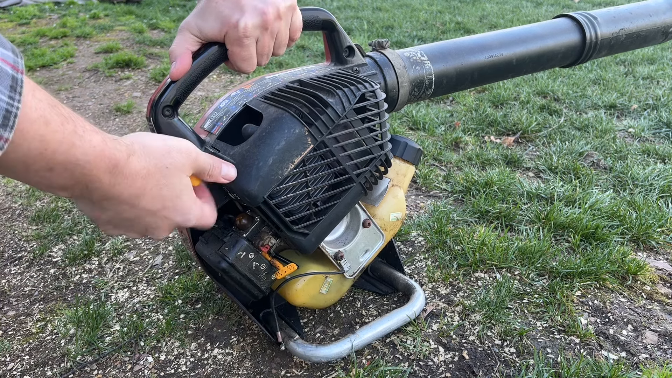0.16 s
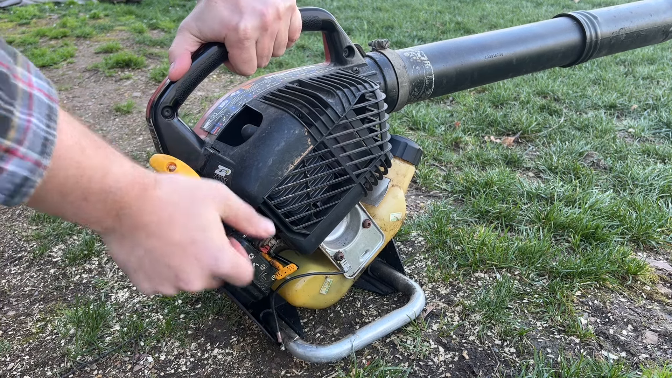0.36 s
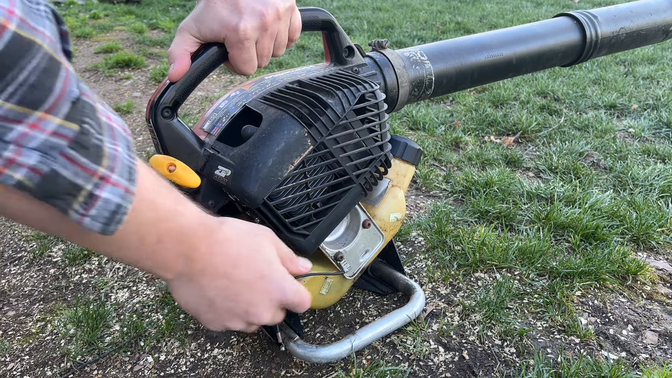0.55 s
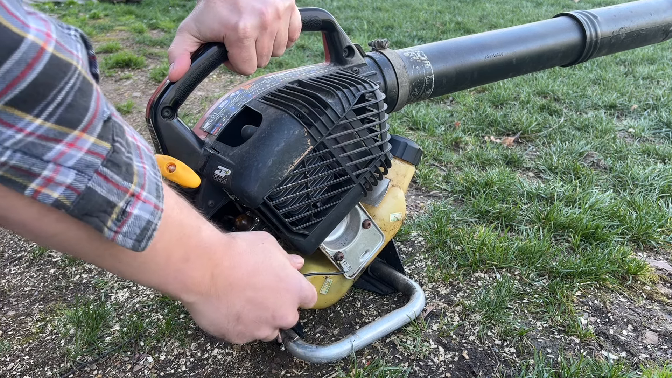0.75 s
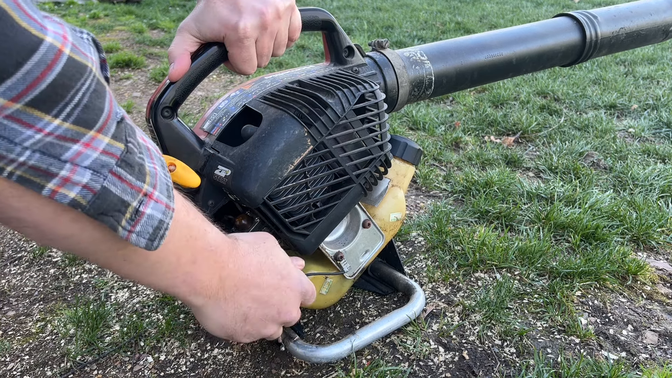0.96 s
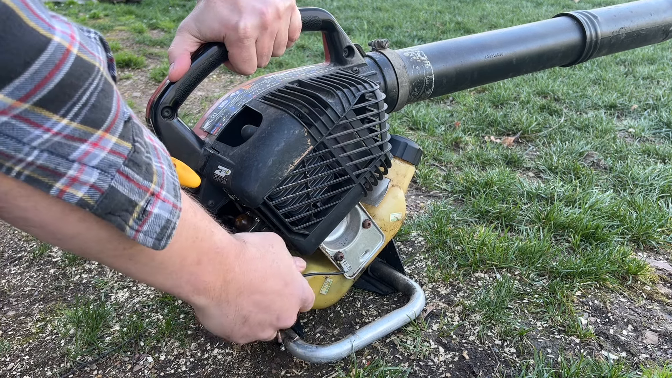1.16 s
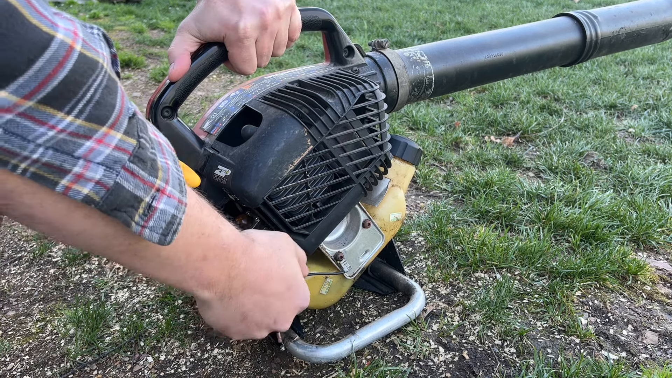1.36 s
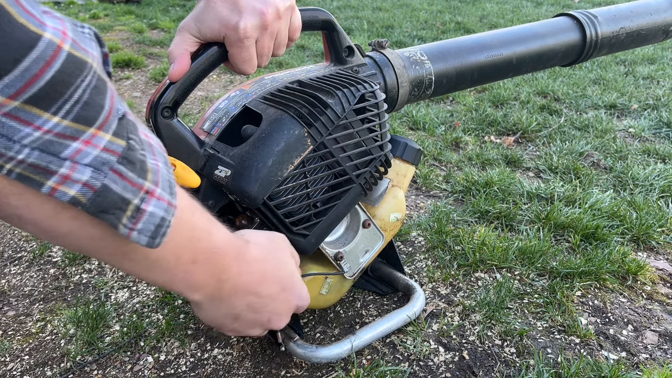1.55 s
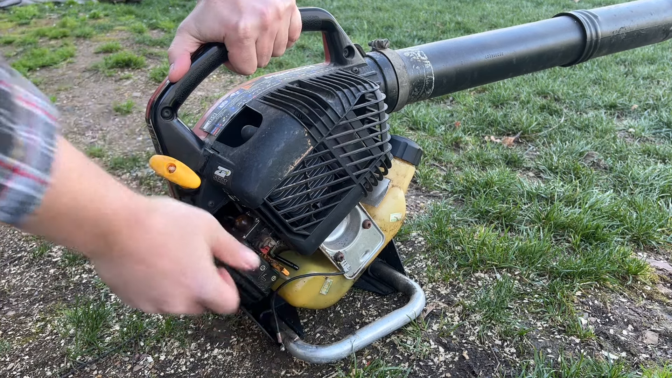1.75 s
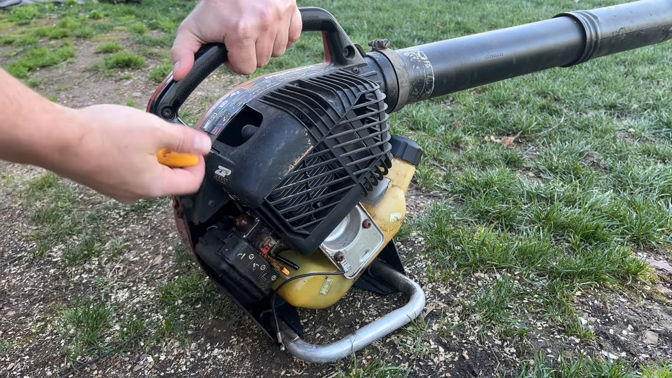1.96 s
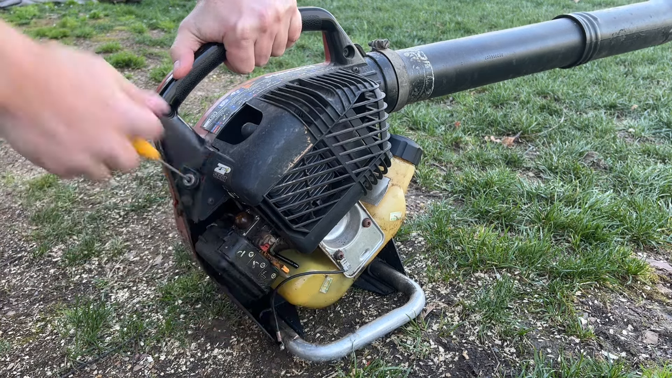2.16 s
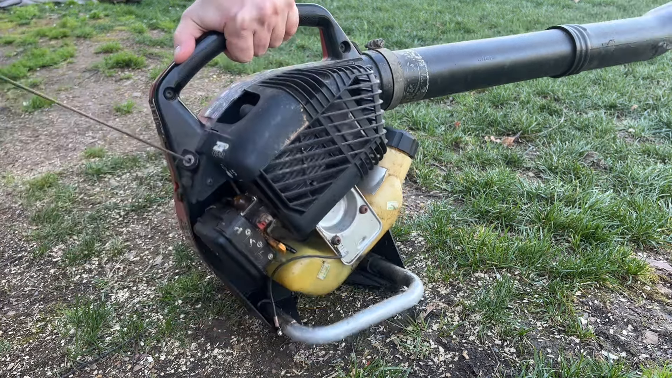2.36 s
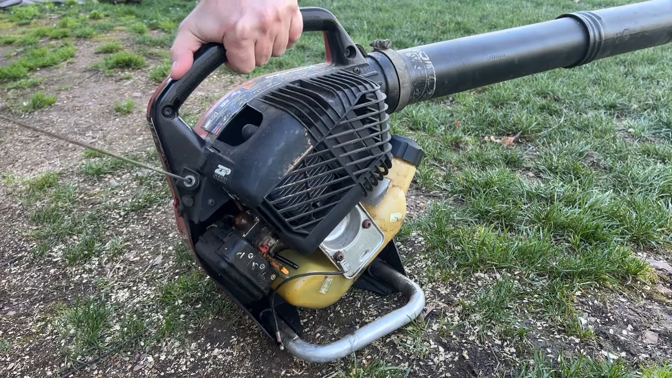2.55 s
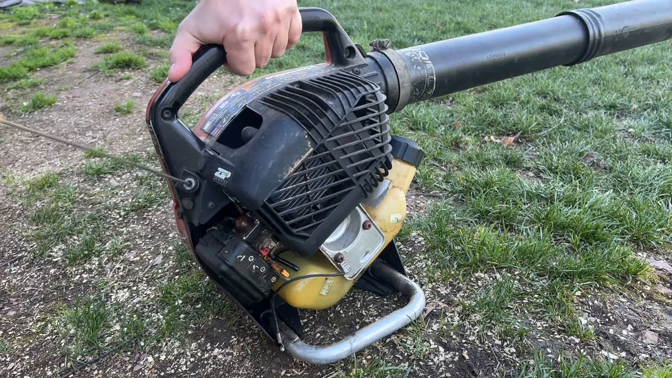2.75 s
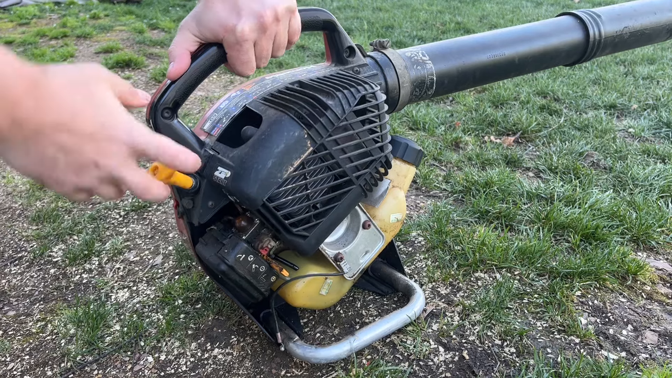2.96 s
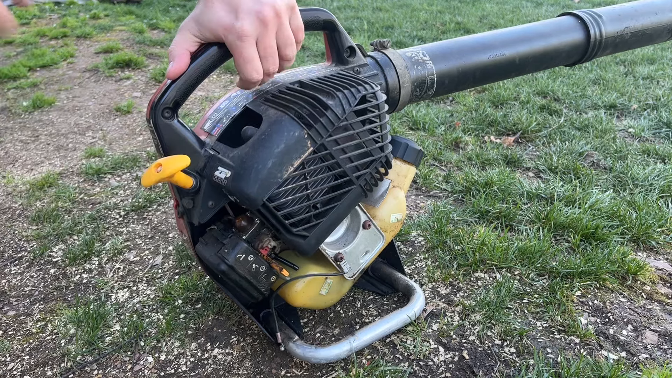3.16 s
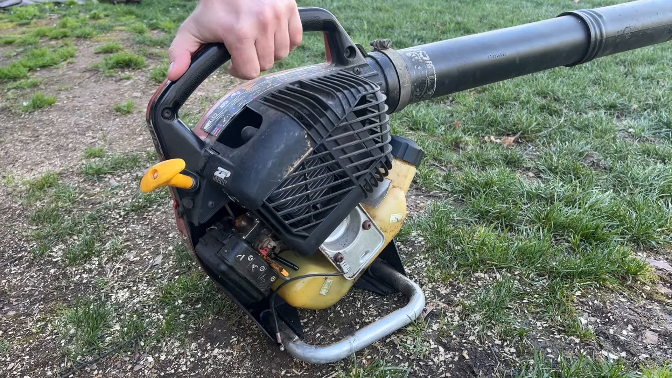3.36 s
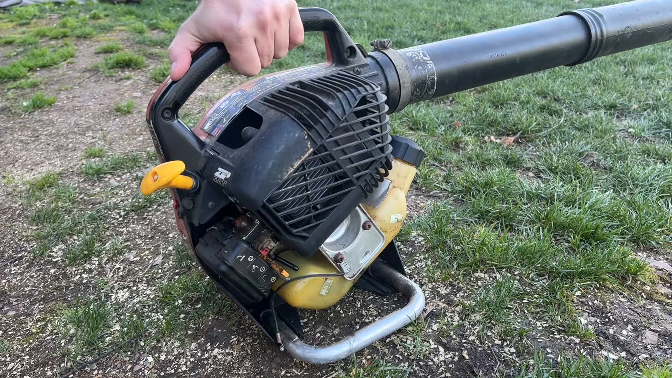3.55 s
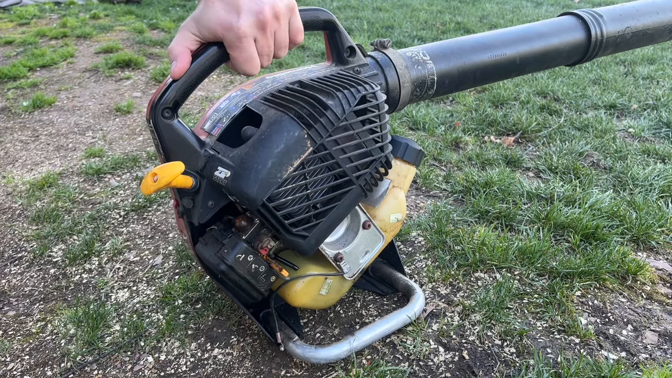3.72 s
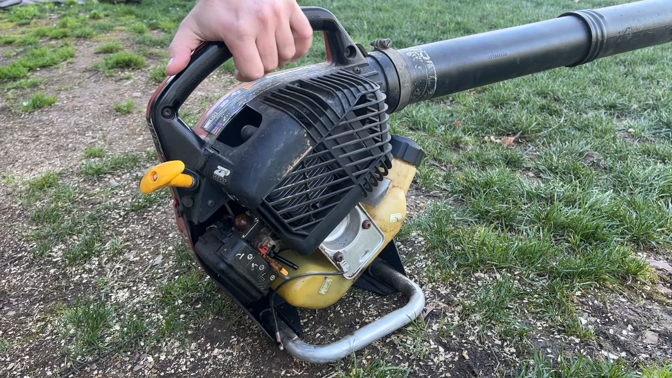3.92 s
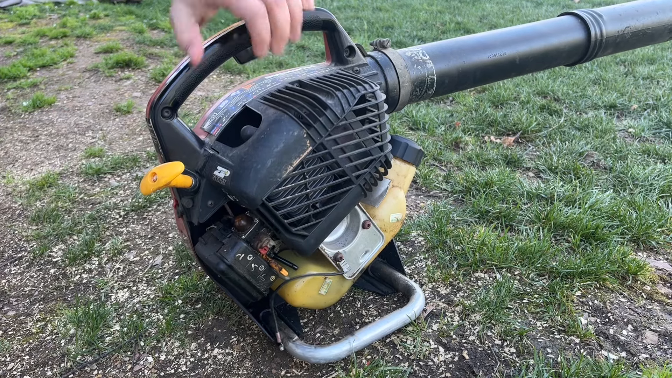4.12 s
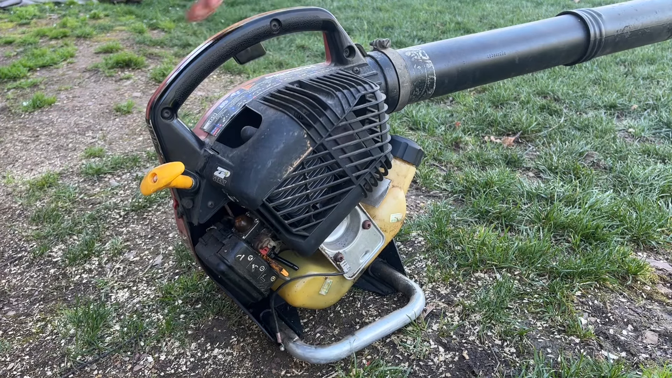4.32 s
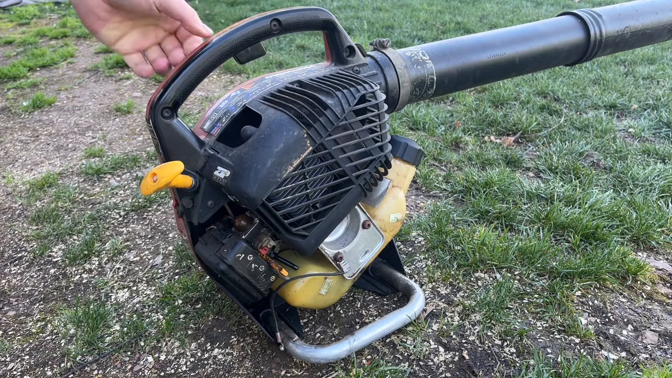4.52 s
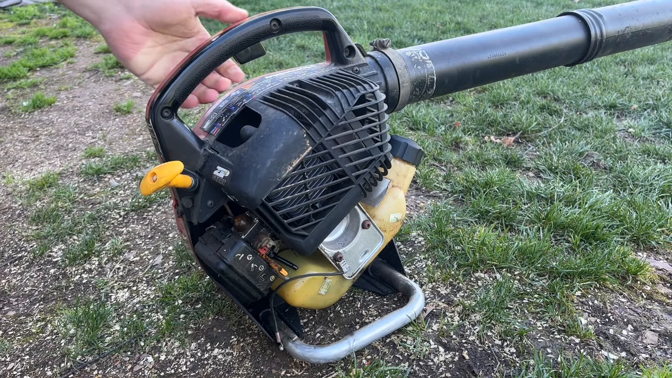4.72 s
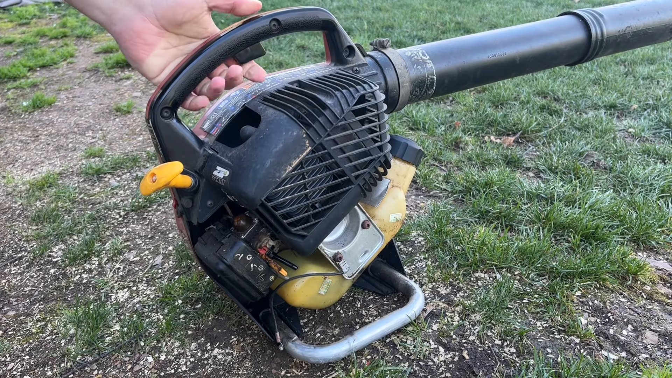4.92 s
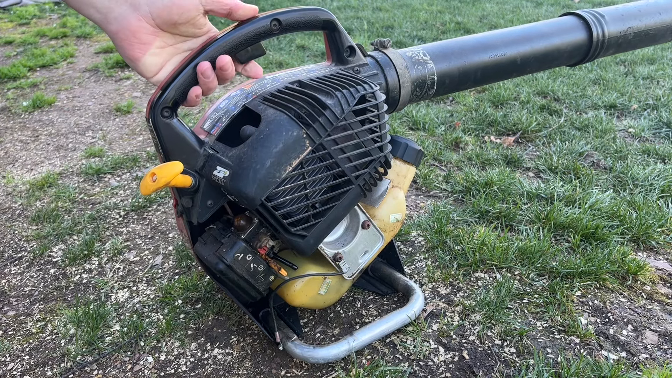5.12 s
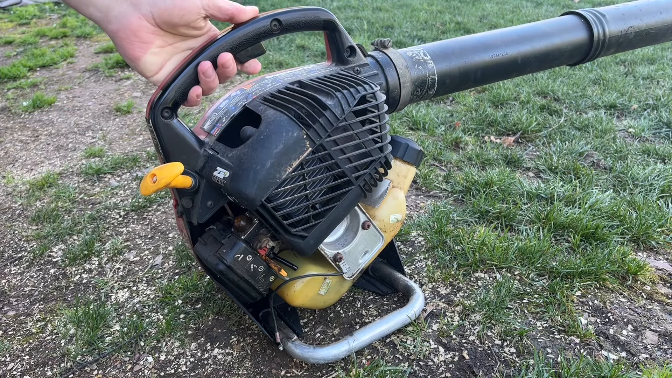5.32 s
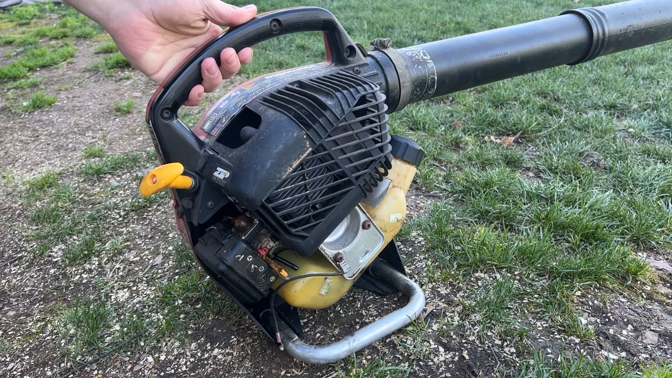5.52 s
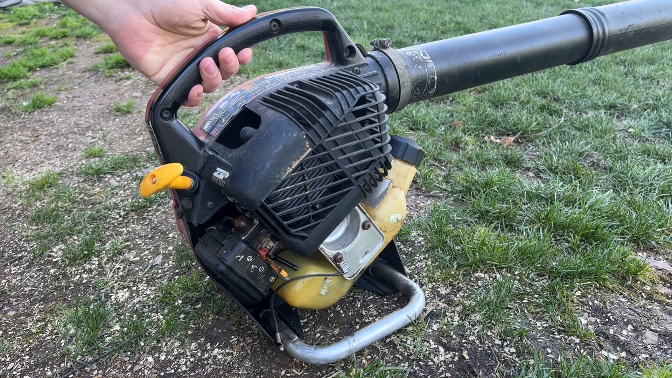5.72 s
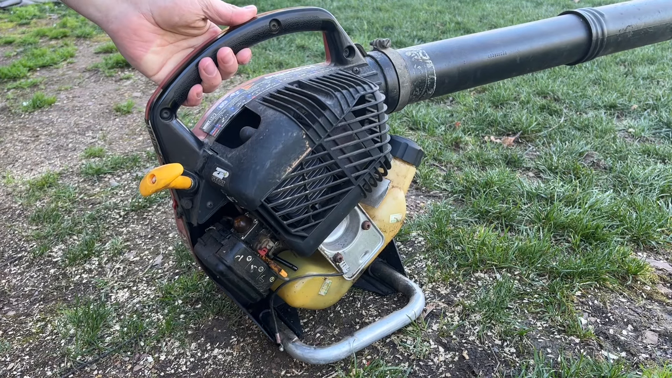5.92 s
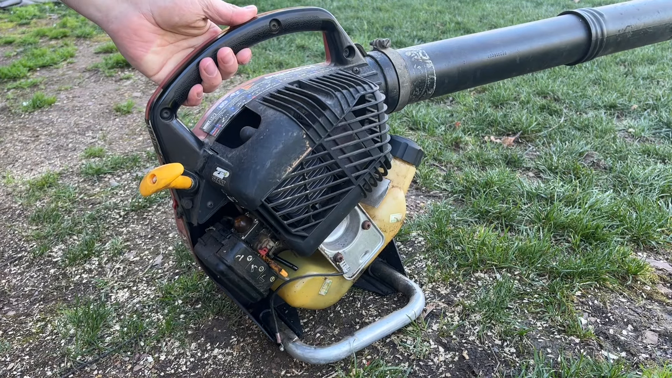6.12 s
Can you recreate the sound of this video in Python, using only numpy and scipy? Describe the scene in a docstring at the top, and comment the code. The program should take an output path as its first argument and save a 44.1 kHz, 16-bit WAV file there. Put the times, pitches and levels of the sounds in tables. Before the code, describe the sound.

Close outdoors, over faint far traffic, a hand brushes and taps plastic parts for two seconds. A quick cord whirr, and a small two-stroke engine bursts to life, rattling as it climbs. It dips, revs higher, coasts down to a slow, lumpy putter, then roars up again and is still held at the end. Close phone microphone with slight stereo width.

```python
"""On a lawn, close to a phone with two microphone ports; far traffic rumbles throughout as shaped noise.
First a hand fumbles at starter and primer: cloth rustles as noise, plastic taps ring as decaying tones.
The cord whirrs, a small two-stroke leaf blower catches, and a second pulse train rattles in the housing.
Three revs follow: shaft orders, intake barks and exhaust puffs once a turn, with casing rattle and fan hiss.
Between revs it coasts with lone firings; the sound ends with the third throttle opening still held."""
import sys
import numpy as np
from scipy import signal
from scipy.fft import rfft, irfft, next_fast_len
from scipy.io import wavfile
from scipy.ndimage import uniform_filter1d, map_coordinates

SR = 44100
rng = np.random.default_rng(int(sys.argv[2]) if len(sys.argv) > 2 else 0)


def materialize(psi):
    """Save the field psi as 16-bit PCM at rate SR to the path in sys.argv[1].

    A 1-D psi becomes a single channel; in a 2-D psi each row is a channel.
    """
    bounded = np.clip(np.atleast_2d(psi).T, -1, 1)
    quanta = np.round(bounded * 32767).astype(np.int16)
    wavfile.write(sys.argv[1], SR, quanta)


N = 272538


def amp(db):
    """Amplitude factor of a level in dB."""
    return 10 ** (np.asarray(db) / 20)


def unit(x):
    """x scaled to rms 1."""
    return x / np.sqrt(np.mean(x ** 2) + 1e-20)


def clock():
    """Time of every sample in seconds."""
    return np.arange(N) / SR


def along(points, hz):
    """Values of (f/Hz, value) points, joined on a log frequency axis."""
    f, v = np.transpose(points)
    return np.interp(np.log(hz + 1), np.log(f + 1), v)


def curves(rows):
    """One value per sample for each column after the time."""
    s, *cols = np.transpose(rows)
    return [np.interp(clock(), s, c) for c in cols]


def running(rows):
    """0 before the first row's time, then a quick rise to 1."""
    return np.clip((clock() - rows[0][0]) / 0.013, 0, 1)


def wobble(rate):
    """A smooth random curve with rate knots a second."""
    coarse = np.arange(0, N + 32, 32)
    knots = rng.standard_normal(int(N * rate / SR) + 4)
    return np.interp(np.arange(N), coarse, map_coordinates(knots, [coarse * rate / SR]))


def filtered(x, response):
    """x passed through a complex response of frequency."""
    m = next_fast_len(N + SR // 2)
    return irfft(rfft(x, m) * response(np.fft.rfftfreq(m, 1 / SR)), m)[..., :N]


def modes(table):
    """Causal response of (f/Hz, width/Hz, level/dB) resonances, added with alternating sign."""
    def response(f):
        return sum((-1) ** k * amp(db) * 1j * f * width / (c * c - f * f + 1j * f * width)
                   for k, (c, width, db) in enumerate(table))
    return response


def steady(x, seconds):
    """x with its slow level evened out to rms 1."""
    return x / np.sqrt(np.abs(uniform_filter1d(x ** 2, round(seconds * SR))) + 1e-12)


# far traffic: t/s, level/dB
TRAFFIC_LEVEL = [(0, -46), (.6, -45), (1.3, -47), (1.65, -43), (2.1, -45)]
# its spectrum: f/Hz, relative level/dB per Hz
TRAFFIC_SPECTRUM = [(25, -28), (75, 1.5), (131, -8.5), (191, -12.5), (330, -23.5), (600, -34.5),
                    (1200, -38), (1800, -45.5), (2200, -56), (4000, -53), (8000, -64), (12000, -58),
                    (15500, -70)]


def traffic():
    """Far road rumble with a thin hiss above it, from spectrally shaped noise."""
    noise = filtered(rng.standard_normal(N), lambda hz: amp(along(TRAFFIC_SPECTRUM, hz)))
    return amp(curves(TRAFFIC_LEVEL)[0]) * unit(noise)


# sleeve and hand brushing past: t/s, length/s, relative level/dB
BRUSHES_PAST = [(.03, .12, -72), (0.173, 0.1, -67.5), (0.376, 0.39, -69), (1.636, 0.43, -69.5),
                (1.87, 0.084, -71), (2.062, 0.14, -69)]
# cloth rustle: f/Hz, relative level/dB per Hz
CLOTH_SPECTRUM = [(800, -13), (1700, -1.5), (3300, -6.5), (5400, -11), (8200, -12), (10000, -15),
                  (12500, -11), (15200, -22)]


def brushes():
    """Cloth rubbing gives noise in soft, grainy swells."""
    t, swell = clock(), 0
    for s, length, db in BRUSHES_PAST:
        ramp = np.minimum((t - s) / (0.22 * length), (s + length - t) / (0.34 * length))
        swell = swell + amp(db) * np.sqrt(np.clip(ramp, 0, 1))
    grain = amp(1.2 * wobble(40) + 2 * wobble(300)) * rng.standard_normal(N)
    return swell * unit(filtered(grain, lambda hz: amp(along(CLOTH_SPECTRUM, hz))))


# plastic taps of hand, primer and starter pawls:
# t/s, relative level/dB, relative treble level/dB, pitch/ratio to the shell's own
PLASTIC_TAPS = [(0.047, -45, -58, 1.01), (0.302, -48, -80, 1.02), (1.397, -50, -67, 1),
                (1.461, -40.5, -26, 1.02), (1.882, -52, -50, 1.03), (2.144, -42, -41, 0.97)]
# plastic shell: f/Hz before the tap's pitch ratio, mean level/dB, time to decay by 60 dB/s
SHELL_TONES = [(450, 6.5, 0.04), (870, 4.5, 0.023), (1286, 2.5, 0.033), (1670, -9, 0.028)]
# steel parts set ringing by a sharp snap: f/Hz, mean level/dB, time to decay by 60 dB/s
STEEL_TONES = [(834, -16, .15), (2713, -4, .05), (3020, -9, .12), (3698, -6, .08), (3978, -9, .07),
               (5136, -6, .1), (6008, -5, .08)]


def ringing(table, t, pitch=1):
    """Struck modes ring as decaying sines, each struck a little louder or softer at random."""
    return sum(amp(level + rng.normal(0, 1.5) - 60 * t / t60) * np.sin(2 * np.pi * pitch * hz * t)
               for hz, level, t60 in table)


def taps():
    """Each touch rings and scuffs the plastic shell; a sharp snap also rings the steel parts."""
    out, scuffs, t = np.zeros(N + SR), np.zeros(N + SR), np.arange(SR // 5) / SR
    for s, db, treble_db, pitch in PLASTIC_TAPS:
        snap = amp(-60 * t / .022) * rng.standard_normal(len(t))
        if treble_db > -40:
            snap = snap + amp(-18) * ringing(STEEL_TONES, t)
        touch = amp(db) * ringing(SHELL_TONES, t, pitch) + amp(treble_db - 0.5) * snap
        start = round(s * SR)
        out[start:][:len(t)] += (1 - np.exp(-t / 0.0016)) * touch
        scuffs[start:][:len(t)] += amp(db - 9 - 60 * t / .12) * rng.standard_normal(len(t))
    return out[:N] + filtered(scuffs[:N], modes([(600, 440, 15.0), (2800, 4600, -26)]))


# broad churn, shared by cord and casing: f/Hz, relative level/dB per Hz
CHURN_SPECTRUM = [(45, -55), (80, -7.5), (260, -4), (500, -7), (700, -12), (1000, -12.5), (1370, -8.5),
                  (1700, -11), (2750, -15), (3600, -10.5), (4200, -19.5), (7000, -30.5), (9000, -47)]
GRIPS_S, SLACK_DB = 2.14, -22.5  # the pawls grip; added level before that
CATCH_S, CORD_DB, CORD_DB_PER_S = 2.19, -30, 198  # engine catches; level there and its rise up to it
CORD_TOP_HZ = 1900  # the whirr is dull above this


def cord():
    """The pulled cord whirrs up through the housing just before the engine catches, as dull noise."""
    t = clock()
    slope = np.where(t < CATCH_S, CORD_DB_PER_S, -600)
    slack_db = SLACK_DB * np.clip((GRIPS_S - t) / 0.013, 0, 1)
    swell = amp(CORD_DB + slope * (t - CATCH_S) + slack_db)
    color = lambda hz: amp(along(CHURN_SPECTRUM, hz)) / (1 + (hz / CORD_TOP_HZ) ** 2)
    return swell * unit(filtered(rng.standard_normal(N), color))


# second pulse train during the first rev: t/s, rate/pulses a second, relative level/dB
HOUSING_RATTLE = [(2.28, 43, -24), (2.48, 45, -19), (2.56, 51, -18), (2.7, 43, -16), (2.78, 43, -15),
                  (2.87, 38.5, -16), (2.96, 36, -20)]
# starter housing: f/Hz, width/Hz, level/dB
HOUSING_MODES = [(288, 113, -1), (486, 146, -6), (620, 93, -12)]


def housing_rattle():
    """A second pulse train rattles in the housing during the first rev, at its own, finally slowing rate."""
    rate, level_db = curves(HOUSING_RATTLE)
    angle = 2 * np.pi * np.cumsum(rate) / SR
    train = amp(1.0 * wobble(40)) * sum(np.cos(k * angle) for k in range(3, 20))
    ending = np.clip((HOUSING_RATTLE[-1][0] - clock()) / .04, 0, 1)
    housing = unit(filtered(train, modes(HOUSING_MODES)))
    return running(HOUSING_RATTLE) * ending * amp(level_db) * housing


# sharp metallic knocks: t/s, relative level/dB, low clang/dB against the knock
METAL_KNOCKS = [(2.186, -30.5, 17), (2.2166, -25, -3), (2.3964, -15.5, -2), (2.41, -16.5, -1),
                (2.4937, -17.5, -7), (2.53, -20, 1), (2.5524, -22, -8), (2.5907, -15.5, -21),
                (2.6245, -22, -9), (2.647, -22, 0), (2.6746, -19, -2), (2.71, -18.5, -15),
                (2.7298, -21, -5), (2.7511, -14.5, -5), (2.8243, -21.5, 7.5), (2.8759, -19, 3),
                (2.915, -16, -5), (2.9574, -20, -3), (3.0333, -16, 2), (3.3073, -20, -1), (3.435, -18, -15),
                (3.477, -25, 0), (3.554, -24.5, 19.5), (3.7923, -26, 17.5), (4.7992, -25, -9),
                (4.9326, -27, -6), (5.0728, -27.5, -11), (5.2357, -26, 2), (5.3915, -32, -5),
                (5.4903, -26.5, -17), (5.581, -28, -2), (5.614, -29, 6)]
KNOCK_TOP_DB, EARLY_TOP_DB = -10.5, 0.5  # top band against the knock; added to the early ones


def knocks():
    """Short noisy metallic cracks ring three bands, some duller, some brighter."""
    bands, t = np.zeros((3, N + SR)), np.arange(SR // 20) / SR
    for s, db, low_db in METAL_KNOCKS:
        top_db = KNOCK_TOP_DB + (EARLY_TOP_DB if s < 2.51 else 0)
        crack = (1 - np.exp(-t / 0.0027)) * amp(db + 9.0 - 60 * t / 0.023)
        crack = crack * rng.standard_normal(len(t))
        bands[:, round(s * SR):][:, :len(t)] += amp([[0], [top_db], [low_db]]) * crack
    metal = [[(2980, 920, 5.5), (6900, 5200, 5.5)], [(11000, 6700, 13.4)], [(2230, 430, 9.2)]]
    return sum(filtered(x[:N], modes(table)) for x, table in zip(bands, metal))


# lone firings in the muffler: t/s, relative level/dB, settled pitch f/Hz, snap/dB against the firing
LONE_FIRINGS = [(2.187, -1, 434, -35), (2.271, -12.5, 440, 0), (2.318, -16, 444, -0.5),
                (3.31, 0, 450, -14.5), (3.421, 1.5, 391, -32), (4.296, -8.5, 450.2, -20),
                (4.558, -19, 293.9, -17), (4.655, -17, 266, -14), (4.726, -15.5, 245.7, -17),
                (4.8, -10.5, 254.2, -20), (4.933, -10, 270, -25), (5.08, -10.5, 268.3, -26),
                (5.237, -9.5, 270, -16), (5.394, -14.5, 269.6, -13), (5.458, -13, 300.4, -11),
                (6.016, -11, 454.9, -20), (6.043, 3, 455.4, -17), (6.093, -1, 453, -18)]


def pops():
    """A lone firing snaps, rings the muffler with a falling note and comes back once along the pipe."""
    out, t = np.zeros(N + SR), np.arange(SR // 20) / SR
    for s, db, hz, snap_db in LONE_FIRINGS:
        note = np.sin(2 * np.pi * hz * (t + 0.00084 * (1 - np.exp(-t / 0.0012))))
        body = 0.59 * (270 / hz) ** 2 * np.sin(2 * np.pi * 155 * t)
        ring = (1 - np.exp(-t / 0.0033)) ** 2 * amp(5.5 - 60 * t / 0.03) * (note + body)
        crack = np.sin(2 * np.pi * 1400 * t) + 0.5 * np.sin(2 * np.pi * 1950 * t)
        snap = amp(snap_db - 60 * t / 0.053) * crack
        out[round(s * SR):][:len(t)] += amp(db) * (ring + snap)
    back = np.pad(out, (round(0.01064 * SR), 0))[:N]
    return out[:N] + amp(-14) * back


# revs: throttle opens t/s, shuts t/s, level at opening/dB, once caught up/dB, at shutting/dB,
# of the coast after it/dB, burns on for/s, how fully/0-1
THROTTLE_REVS = [(2.23, 3.053, -3.5, 0, 1, 4, .02, .2), (3.415, 3.882, 0, 1.5, -1.5, -0.1, 0.15, 1),
                 (5.457, 6.3, -8.5, -3, -0.5, .3, .1, 1)]
OPENS_S, SHUTS_S, CATCHES_UP_S = 0.011, 0.018, 0.15


def throttle():
    """Opening 0-1, level in dB of each rev and the coast after it, and leftover fuel burning on 0-1."""
    rows, coast_db = [], THROTTLE_REVS[0][2]
    for opens, shuts, first_db, full_db, last_db, after_db, burn, fully in THROTTLE_REVS:
        closed = shuts + SHUTS_S
        rows += [(opens, 0, coast_db, 0),
                 (opens + OPENS_S, 1, first_db, 0),
                 (opens + CATCHES_UP_S, 1, full_db, 0),
                 (shuts, 1, last_db, 0),
                 (closed, 0, after_db, fully),
                 (closed + burn, 0, after_db, fully),
                 (closed + SHUTS_S + burn, 0, after_db, 0)]
        coast_db = after_db
    return curves(rows)


# crankshaft before the firing kicks: t/s, speed/turns a second
SHAFT_SPEED = [(2.2, 26.6), (2.38, 30.1), (2.73, 51.3), (2.85, 62), (3.04, 88.6), (3.09, 99), (3.14, 84),
               (3.29, 78), (3.42, 63.7), (3.5, 74.7), (3.65, 99), (3.87, 119), (3.92, 121), (4.04, 106.7),
               (4.18, 92), (4.35, 81), (4.54, 66.8), (4.76, 53.8), (5.15, 44.9), (5.41, 46.4), (5.5, 46.6),
               (5.79, 99.6), (5.85, 107.3), (6.09, 124.7), (6.18, 125)]
# kick size in turns a second before its rise and fade, fading time in s, turns a second under which it shows
KICK, KICK_S, IDLE = 9, .12, 58


def speed():
    """Turns a second; at idle with the throttle shut, every lone firing kicks the shaft on."""
    rate, t = curves(SHAFT_SPEED)[0], np.arange(SR // 2) / SR
    kicks = np.zeros(N + SR)
    for s, *_ in LONE_FIRINGS:
        kicks[round(s * SR):][:len(t)] += KICK * (1 - np.exp(-t / .01)) * np.exp(-t / KICK_S)
    swing = kicks[:N] - uniform_filter1d(kicks[:N], SR // 3)
    return rate + swing * np.clip((IDLE - rate) / 8, 0, 1) * (1 - throttle()[0])


def turns():
    """Shaft angle in turns, the running sum of its speed."""
    return np.cumsum(speed()) / SR


def per_turn(values):
    """One value for each turn, changing between the pulses."""
    return map_coordinates(values, [turns()], order=1)


def shaking(repeat):
    """Noise of which a share comes back the same on every turn, so that it glides with the shaft."""
    pattern = map_coordinates(rng.standard_normal(160), [turns() % 1 * 160], mode="grid-wrap")
    repeat = np.clip(repeat, 0, 1)
    return np.sqrt(repeat) * unit(pattern) + np.sqrt(1 - repeat) * rng.standard_normal(N)


# shaking: t/s, casing rattle level/dB, fan hiss level/dB
SHAKE_LEVELS = [(2.205, -17, -48), (2.23, -23.5, -41), (2.42, -22.5, -33), (2.65, -21, -38),
                (2.84, -25, -36), (3.06, -22.5, -31), (3.4, -25, -34.5), (3.64, -23, -29),
                (3.9, -24, -30.5), (4.1, -26, -36), (4.3, -28.5, -42.5), (4.7, -31.5, -47.5),
                (5.2, -32.5, -49.5), (5.45, -33, -47), (5.62, -29, -38.5), (5.9, -24, -31),
                (6.18, -22.5, -31)]
# cowl and fins: f/Hz, width/Hz, level/dB
CASING_MODES = [(1914, 350, -6.5), (2483, 44, -3.5), (3028, 107, -4), (3695, 29, 2.5), (4065, 37, -9),
                (4190, 130, -12.5), (4790, 76, -11.5), (5730, 56, -31), (6074, 64, -6.5)]
# the cowl's strongest mode: f/Hz, width/Hz, level/dB
COWL_MODE = [(1340, 150, 0)]
# a cooling fin that sings: f/Hz, width/Hz, level/dB
FIN_MODE = [(3650, 116, 0)]
# fan hiss: f/Hz, relative level/dB per Hz
FAN_SPECTRUM = [(2500, -39), (4000, -4.5), (6200, -3.5), (7200, -2), (8300, -15), (9500, -2.5), (11000, -8),
                (12500, -7), (14200, -13.5), (15600, -57)]
HUM_DB, HUM_FOLLOWS, FIN_DB = -16, 0.7, -9.5  # the cowl follows the rattle in part; fin against the rattle
WAVER_DB = 1.8  # random wavering of cowl and fin


def casing():
    """Piston slap and bearings shake the cowl twice a turn; the fan adds churn and hiss."""
    rattle_db, hiss_db = curves(SHAKE_LEVELS)
    hum_db = HUM_DB + HUM_FOLLOWS * rattle_db + WAVER_DB * wobble(12)
    fin_db = FIN_DB + rattle_db + WAVER_DB * wobble(12)
    angle = 2 * np.pi * turns()
    slap = np.exp(.5 * np.cos(angle) + 0.52 * np.cos(2 * angle + 2.3)) * amp(3.1 * wobble(70))
    ring = steady(filtered(slap * shaking(.3), modes(CASING_MODES)), .2)

    def singing(mode):
        """A narrow mode, filtered twice over."""
        return steady(filtered(np.sqrt(slap) * shaking(.4), lambda hz: modes(mode)(hz) ** 2), .2)

    hum, fin = singing(COWL_MODE), singing(FIN_MODE)
    rough = amp(1.2 * wobble(30)) * shaking(.02)
    churn = steady(filtered(rough, lambda hz: amp(along(CHURN_SPECTRUM, hz))), .2)
    blades = np.exp(0.25 * np.cos(angle - .5)) * amp(1.77 * wobble(60))
    hiss = unit(filtered(blades * rng.standard_normal(N), lambda hz: amp(along(FAN_SPECTRUM, hz))))
    broad = amp(rattle_db) * (amp(-5.5) * ring + amp(0.5) * churn) + amp(hiss_db) * hiss
    return running(SHAKE_LEVELS) * (broad + amp(hum_db) * hum + amp(fin_db) * fin)


def loudness(law, rate, open_db=0, shut_db=0, burn_db=0):
    """dB that follows speed by one law with the throttle open, by another with it shut."""
    opening, rev_db, burning = throttle()
    doublings = np.log2(rate / 100)
    (open_base_db, open_slope), (shut_base_db, shut_slope) = law
    wide = open_base_db + open_slope * doublings + open_db
    shut = shut_base_db + shut_slope * doublings + shut_db + burn_db * burning
    return rev_db + opening * wide + (1 - opening) * shut


# unevenness: speed/turns a second, size scatter/dB with the throttle open, exhaust lag/turns,
# turbulence/dB with the throttle open
UNEVENNESS = [(30, 1.6, .5, 6), (40, 1.6, .45, 5), (50, 1.3, .25, 4), (62, 1.1, .06, 2.5), (90, 1, .08, 3),
              (120, 1, .1, 4)]
CALM_DB = -9  # added to the turbulence with the throttle shut


def uneven():
    """Scatter, lag and turbulence at the present speed; a shut throttle calms scatter and turbulence."""
    rate, opening = speed(), throttle()[0]
    at, *cols = np.transpose(UNEVENNESS)
    scatter_db, lag, swirl_db = [np.interp(rate, at, c) for c in cols]
    return scatter_db * (.6 + .4 * opening), lag, swirl_db + CALM_DB * (1 - opening)


# tones, rows throttle open then shut: base level at 100 turns a second/dB, slope/dB per doubling of speed
TONE_LAW = [(-19.5, 0.18), (-35, 9.1)]
# first to fourth order, rows throttle open then shut: relative level/dB
ORDER_LEVELS = [(-8, 0, -0.49, 0.8), (-4, -4, -1.7, -3.8)]
# what first to fourth order gain while leftover fuel burns on with the throttle shut: level/dB
BURN_GAIN = (0.31, .3, 1.4, 13)
# throttle open, first three orders: f/Hz, level/dB
OUTLET_GAIN = [(30, -35), (60, -4.5), (110, -1.5), (250, -1.3), (380, -1.5)]
# throttle open, the fourth order alone: f/Hz, level/dB
FOURTH_GAIN = [(110, 0.5), (150, -2), (210, -10), (300, -6), (420, -10), (470, 1.5), (540, -13)]
# throttle shut, the muffler drums: f/Hz, level/dB
DRUM_GAIN = [(45, -4), (75, -4.5), (200, 1.5), (340, 6.5), (450, 6.5), (520, 2)]
FIRST_COAST_DB, FIRST_COAST_ENDS_S = 4, 3.5  # the first order is louder in the first coast


def orders():
    """The lowest shaft orders sound as tones, as unsteady as the firing; coasting, they come and go."""
    rate, angle, scatter_db = speed(), turns(), uneven()[0]
    opening, _, burning = throttle()
    coasting = 1 - opening - burning
    first_coast_db, out = FIRST_COAST_DB * (clock() < FIRST_COAST_ENDS_S), 0
    for k, (open_db, shut_db, burn_db) in enumerate(zip(*ORDER_LEVELS, BURN_GAIN), 1):
        open_db = open_db + along(FOURTH_GAIN if k == 4 else OUTLET_GAIN, k * rate)
        shut_db = shut_db + along(DRUM_GAIN, k * rate) + (k == 1) * first_coast_db
        db = loudness(TONE_LAW, rate, open_db, shut_db, burn_db)
        db = db + scatter_db * wobble(30) + 2.0 * coasting * wobble(21)
        jittered = angle - .05 + .006 * scatter_db * wobble(25)
        out = out - amp(db) * np.sin(2 * np.pi * k * jittered)
    return np.sqrt(2) * running(SHAFT_SPEED) * out


# strong and weak turns alternate more at the end: t/s, share/0-1
TURN_ALTERNATION = [(5.85, .1), (6.05, .35)]


def pulses(lag, jitter, lowest):
    """One pulse a turn with turbulence on it, made of the shaft orders from lowest up."""
    scatter_db, _, swirl_db = uneven()
    alternation = curves(TURN_ALTERNATION)[0]
    count = int(turns()[-1]) + 2
    angle = 2 * np.pi * (turns() - lag + jitter * per_turn(rng.standard_normal(count)))
    size = amp(np.clip(scatter_db, 0, 3) * per_turn(rng.standard_normal(count)))
    size = size * (1 + alternation * np.cos(angle / 2))
    rate = speed()
    fading = lambda k: np.clip(1.5 - k * rate / 1600, 0, 1)  # orders full up to 800 Hz, gone at 2400 Hz
    pulse = sum(np.cos(k * angle) * fading(k) for k in range(lowest, 36))
    swirl = np.exp(1.59 * np.cos(angle - .4)) * rng.standard_normal(N)
    return size * (pulse + amp(swirl_db) * swirl)


# pitch, strength before the air box, turns a second under which the whistle shows
WHISTLE_HZ, WHISTLE, WHISTLE_UNDER = 1200, 1.6, 108


def whistle():
    """The carburettor throat whistles one note of wavering phase, let out in a short burst a turn."""
    burst = np.exp(40 * (np.cos(2 * np.pi * turns()) - 1))
    note = np.cos(2 * np.pi * WHISTLE_HZ * clock() + 1.3 * wobble(25))
    slow = np.clip((WHISTLE_UNDER - speed()) / 25, 0, 1)
    return WHISTLE * slow * note * burst / burst.mean()


# air box: f/Hz, width/Hz, level/dB
INTAKE_MODES = [(389, 60, -1), (1083, 80, -3.5), (2230, 105, -7.5)]
# muffler: f/Hz, width/Hz, level/dB
MUFFLER_MODES = [(166, 160, -5), (266, 29.3, 7.5), (451.4, 66.5, 0.5), (707, 61, -14.5)]
# intake, rows throttle open then shut: base level at 100 turns a second/dB, slope/dB per doubling of speed
BARK_LAW = [(-21.5, 2), (-36.5, 32)]
# exhaust, rows throttle open then shut: base level at 100 turns a second/dB, slope/dB per doubling of speed
PUFF_LAW = [(-17, 0.51), (-30.5, 11)]
COAST_TOP_HZ = 570  # without firing the muffler passes little above this


def breathing():
    """The intake gulps once a turn; the exhaust port opens part of a turn later; both ring their boxes."""
    rate, opening = speed(), throttle()[0]
    gulp = filtered(pulses(0, jitter=.008, lowest=5) + whistle(), modes(INTAKE_MODES))
    puff = filtered(pulses(uneven()[1], jitter=.01, lowest=5), modes(MUFFLER_MODES))
    dull = filtered(puff, lambda hz: 1 / (1 + (hz / COAST_TOP_HZ) ** 8))
    puff = steady(puff, 0.1) * opening + steady(dull, 0.35) * (1 - opening)
    intake = amp(loudness(BARK_LAW, rate)) * steady(gulp, 0.07)
    exhaust = amp(loudness(PUFF_LAW, rate, burn_db=7.5)) * puff
    return running(SHAFT_SPEED) * (intake + exhaust)


# left-right likeness at the two ports: f/Hz, likeness/-1 to 1
PORT_LIKENESS = [(60, .98), (400, .96), (900, .85), (3000, .82), (5500, .6), (7500, .95), (9000, .95),
                 (13000, .8)]
# phase by which left leads: f/Hz, lead/radians
LEFT_LEAD = [(100, 0), (780, .6), (1720, 0), (3270, .9), (4820, .4), (5700, -.7), (6400, -.9), (7700, -2.9),
             (8300, -3.14), (8900, -3.4), (11100, -6), (13000, -6.7), (14600, -9.2), (15500, -9.5)]
# left minus right: f/Hz, level/dB
LEFT_TILT = [(60, -2.5), (400, -2.2), (700, 0), (1500, -.4), (3000, -.7), (5500, 1.9), (9000, 0),
             (15000, 0)]


def ports(x):
    """Two microphone ports a few centimetres apart: a lag, a tilt, and a scattered part that differs."""
    t = np.arange(SR // 4) / SR
    tail = rng.standard_normal(len(t)) * amp(-60 * t / .2)
    scatter = signal.fftconvolve(x, tail / np.linalg.norm(tail))[:N]
    turn = lambda hz: np.arccos(np.clip(along(PORT_LIKENESS, hz), -1, 1)) / 2
    share = lambda hz: np.array([np.cos(turn(hz)), np.sin(turn(hz))])
    mid, side = filtered(np.array([x, scatter]), share)
    half = np.array([[.5], [-.5]])  # left, right
    offset = lambda hz: amp(half * along(LEFT_TILT, hz)) * np.exp(1j * half * along(LEFT_LEAD, hz))
    return filtered(np.array([mid + side, mid - side]), offset)


def scene():
    """Everything on the lawn, summed and heard at the two ports."""
    background = traffic() + brushes() + taps()
    rattles = housing_rattle() + knocks() + casing()
    engine = pops() + orders() + breathing()
    return ports(background + cord() + rattles + engine)


TOP_HZ = 15750  # band limit


def record(dry):
    """The microphone channels round peaks off towards 1.2; nothing is kept above the band limit."""
    soft = dry / (1 + np.abs(dry / 1.2) ** 6) ** (1 / 6)
    return filtered(soft, lambda hz: hz < TOP_HZ)


dry = scene()
out = record(dry)
materialize(out)
```